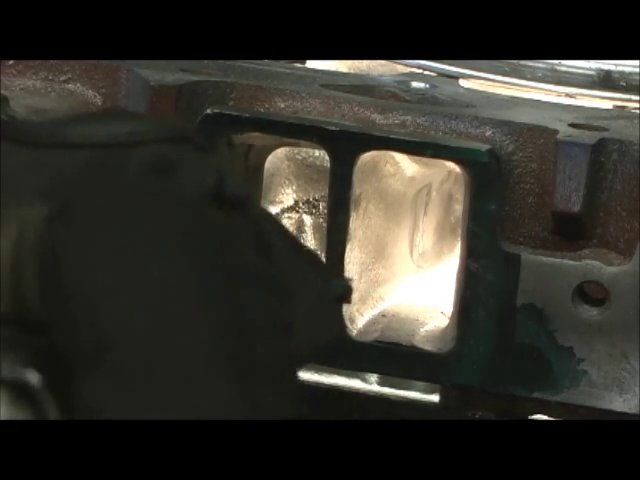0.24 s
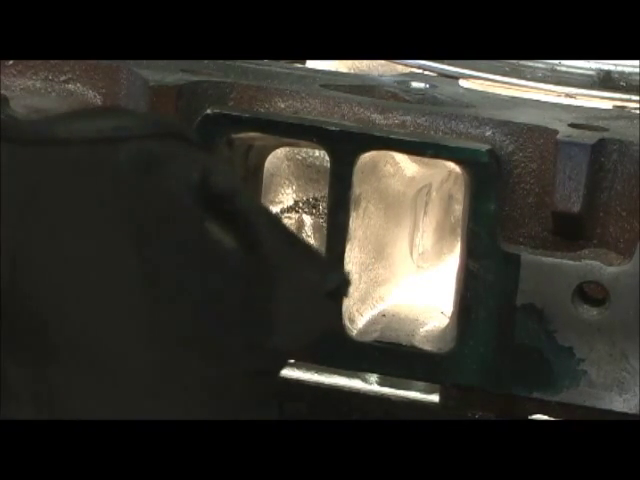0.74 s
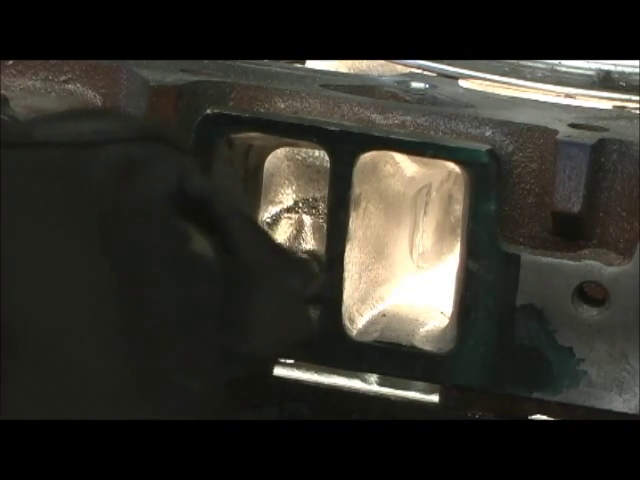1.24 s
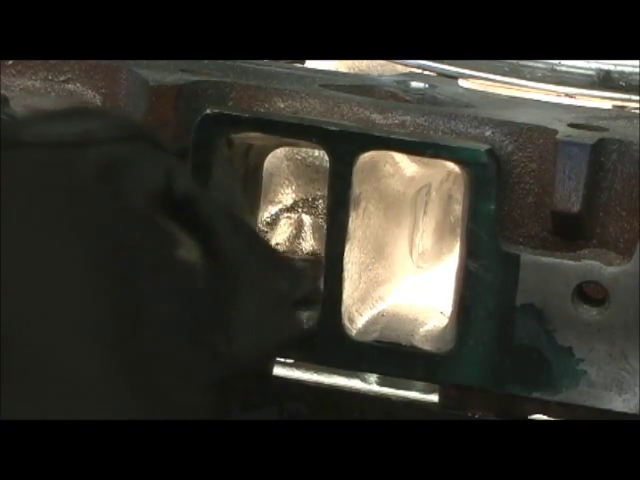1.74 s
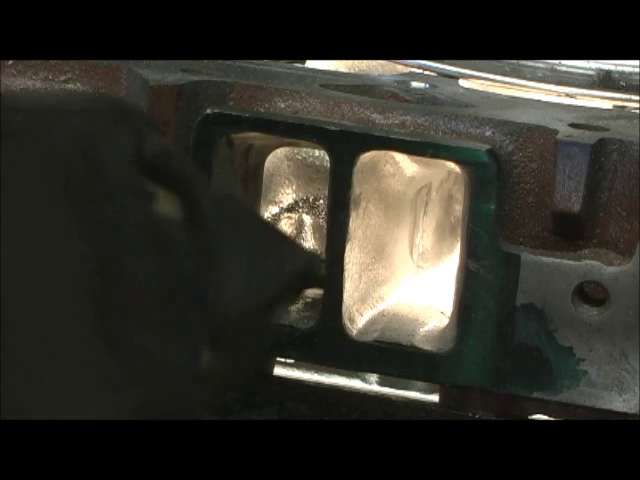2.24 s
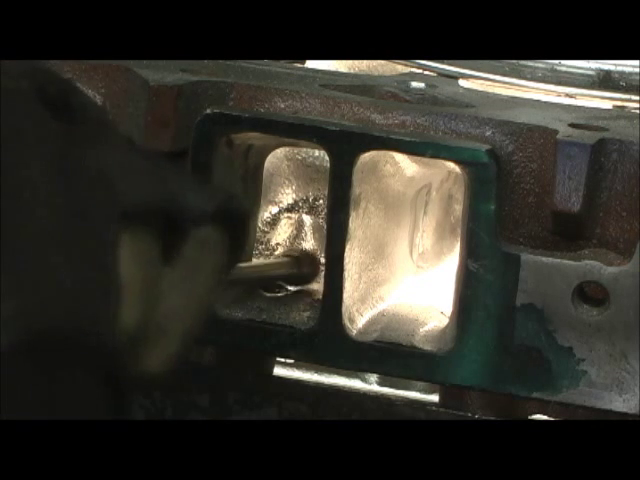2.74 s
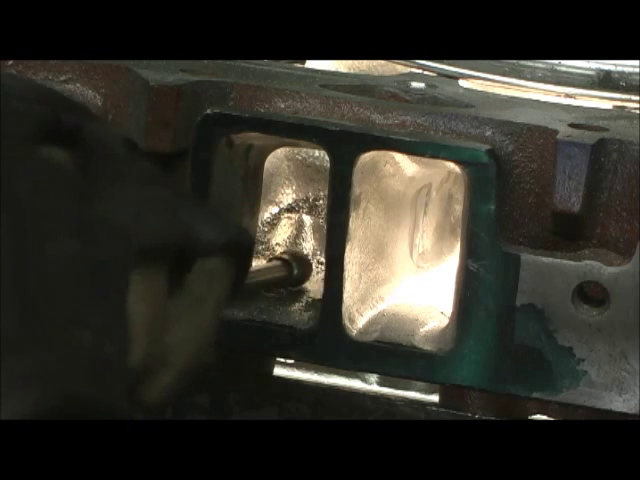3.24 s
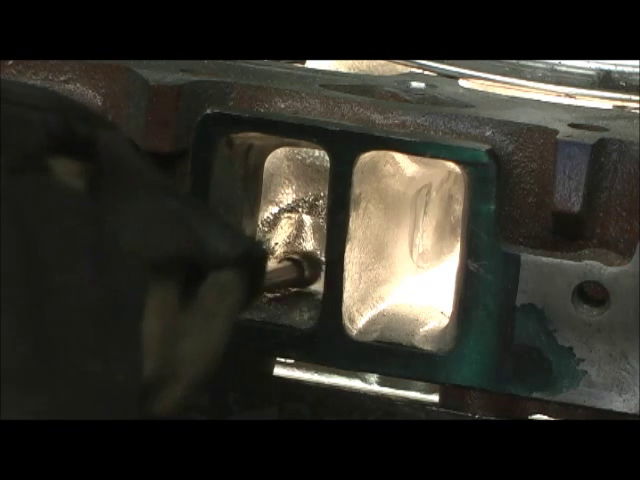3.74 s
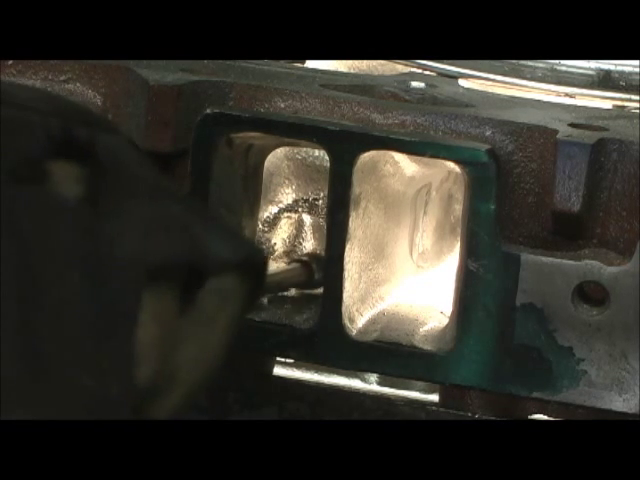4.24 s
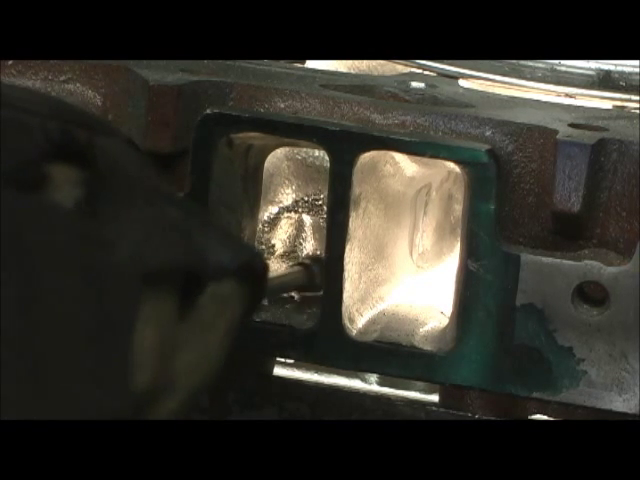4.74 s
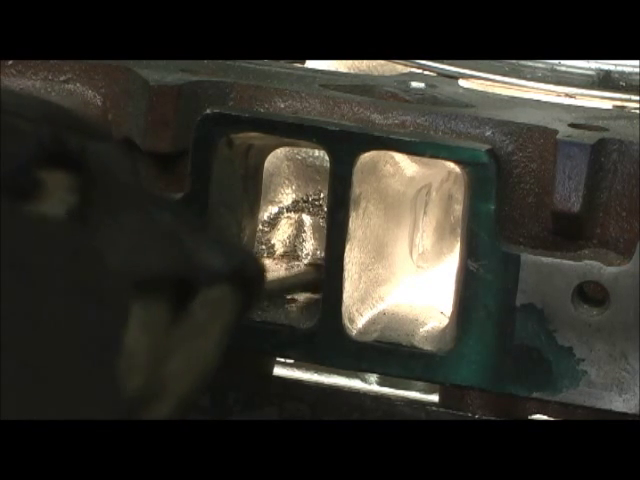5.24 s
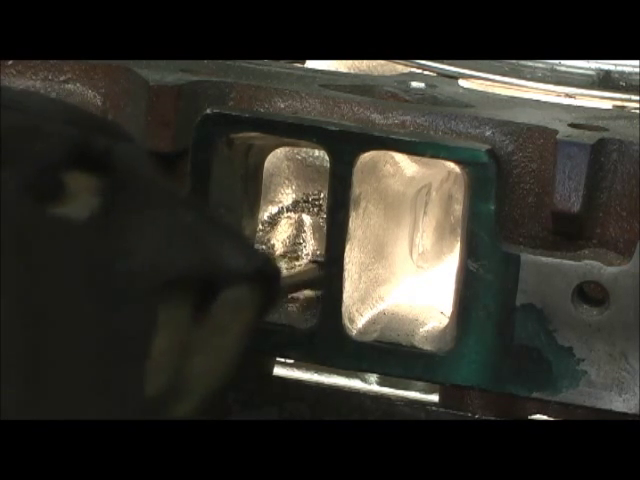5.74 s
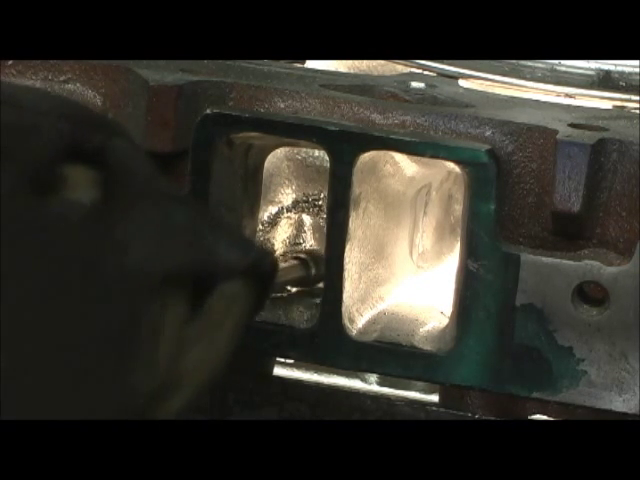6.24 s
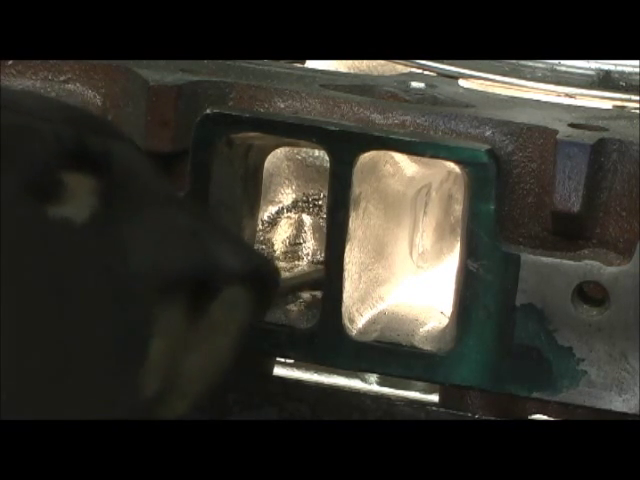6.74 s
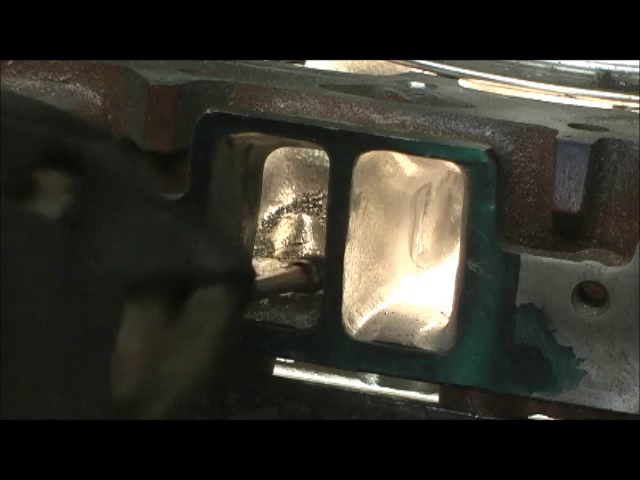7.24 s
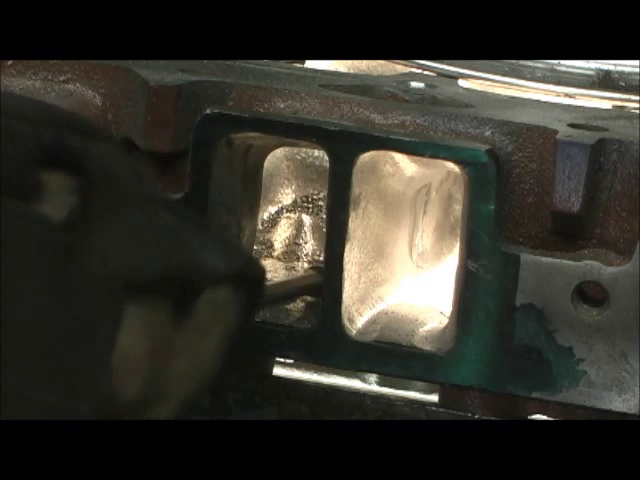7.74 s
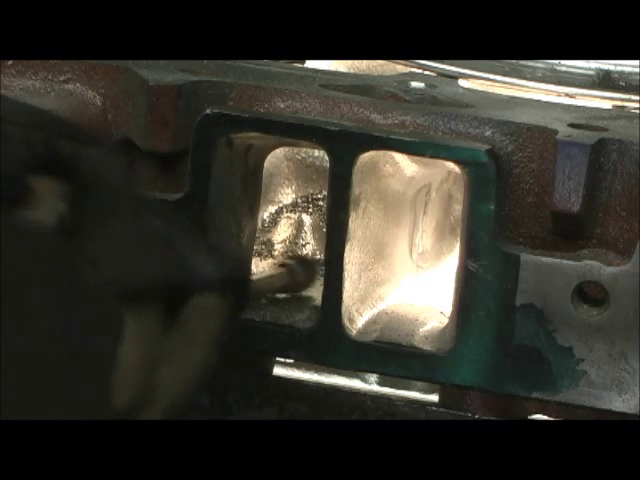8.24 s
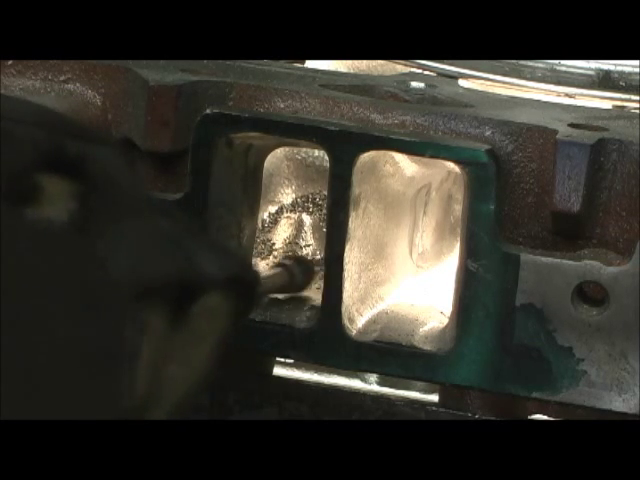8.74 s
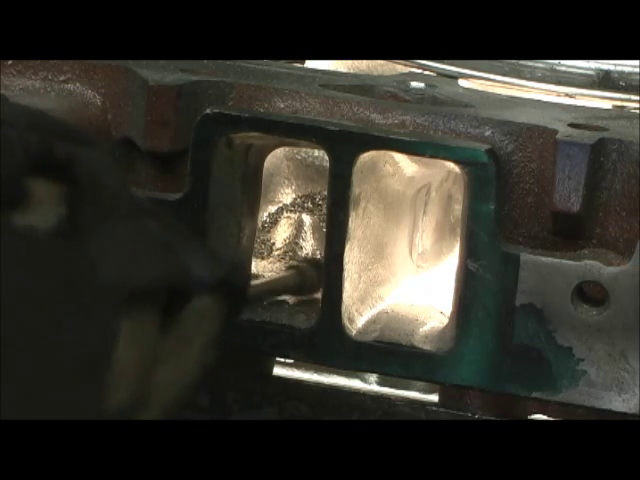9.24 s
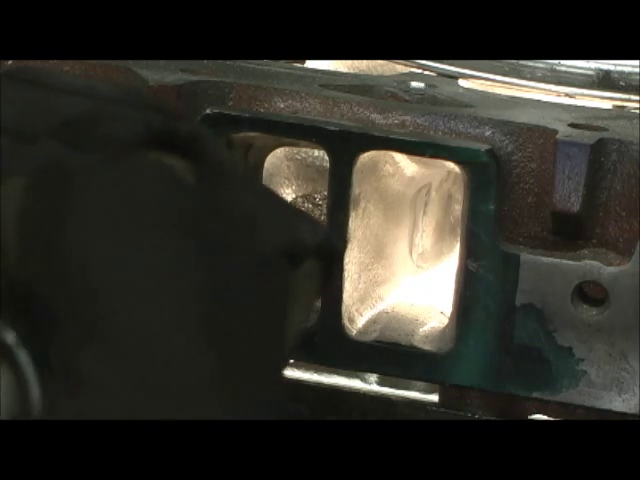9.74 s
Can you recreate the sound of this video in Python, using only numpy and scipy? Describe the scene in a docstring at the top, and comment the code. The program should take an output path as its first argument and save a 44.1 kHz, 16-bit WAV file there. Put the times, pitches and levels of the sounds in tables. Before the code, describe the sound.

A handheld die grinder grinds inside a cast-iron engine part for the full ten seconds, close to the microphone. A bright, gritty hiss and scrape dominate, over a high motor whine and a faint hum. For the first two seconds, a ringing rush of cooling air is strong and the whine is clear, wavering slightly. Around 2 seconds the pitch rises, a few thin squeals sound, and the air eases. From about 3 to 9 seconds the whine is softer and sags repeatedly as the bit is pressed in, up to three times a second, while the long shank rings and chatters. The casting rumbles very faintly on its bench. The air flares near 6.3 seconds, with a cluster of short, very high squeals until about 7 and more after 8. Around 9.5 seconds the air swells again, the ringing fades, and a longer squeal joins the continuing grinding.

```python
"""A die grinder with a long bit works inside a port (a passage) of a cast-iron engine part, close by.
Its motor whines and hums while cooling air blows. Countless grit impacts, bunched once a turn, ring the
iron and the bit's shank. The hand rocks the bit about three times a second: each press drags the whine
down and makes the shank ring louder, and each light skim along the wall hisses. Now and then the bit's
edge squeals, and the heavy casting rumbles faintly on its bench."""
import sys
import numpy as np
from scipy.fft import rfft, irfft
from scipy.io import wavfile

SR = 44100
rng = np.random.default_rng(int(sys.argv[2]) if len(sys.argv) > 2 else 0)


def int16_out(signal):
    """Quantize to a 16-bit WAV file."""
    q = np.round(np.clip(np.atleast_2d(signal).T, -1, 1) * 32767)
    wavfile.write(sys.argv[1], SR, q.astype(np.int16))


N = 441000
TIME = np.arange(N) / SR
BIN_HZ = np.maximum(np.arange(N // 2 + 1) * SR / N, 1)   # the frequencies of a spectrum


def from_db(db):
    """Turn decibels into a number to multiply a sound by."""
    return 10 ** (np.asarray(db) / 20)


def unit_level(x):
    """Scale a signal so that its average size (rms) is 1."""
    return x / np.sqrt(np.mean(x ** 2) + 1e-20)


def over_time(rows):
    """Join a table's points in time with straight lines, one curve for each column of values."""
    times, *columns = np.transpose(rows)
    return [np.interp(TIME, times, column) for column in columns]


def over_hz(points):
    """Join a table's points across frequency, giving each octave the same room."""
    hz, value = np.transpose(points)
    return np.interp(np.log(BIN_HZ), np.log(hz), value)


def drift(rate_hz):
    """A random wobble of size 1, mostly slower than the given rate."""
    return unit_level(irfft(rfft(rng.standard_normal(N)) / (1 + (BIN_HZ / rate_hz) ** 2), N))


def swell(start, length, attack, release):
    """Rise from 0 towards 1, hold, and fall back; all times are in seconds."""
    return np.clip(np.minimum((TIME - start) / attack, (start + length - TIME) / release), 0, 1)


def bumps(events, length_s):
    """A rounded bump centred on each event's time, one curve for each column of strengths."""
    events, half = np.array(events), length_s / 2
    shapes = [np.sin(np.pi / 2 * swell(s - half, length_s, half, half)) ** 2 for s in events[:, 0]]
    return events[:, 1:].T @ np.array(shapes)


def band(low_hz, high_hz, order):
    """A filter that keeps what lies between two frequencies; a higher order gives sharper edges."""
    return 1 / ((1 + (low_hz / BIN_HZ) ** order) * (1 + (BIN_HZ / high_hz) ** order))


def mode_power(modes):
    """How strongly an object answers each frequency, given its modes (the pitches it rings at)."""
    return sum(from_db(db) ** 2 / (1 + ((BIN_HZ - hz) / (width / 2)) ** 2) for hz, width, db in modes)


def play(spectrum, level_db):
    """Turn a spectrum into sound that follows a level curve."""
    return from_db(level_db) * unit_level(irfft(spectrum, N))


def tones(turns, multiples, level_db, flutter_db):
    """Tones at whole multiples of the shaft's speed, each fluttering a little in level."""
    out = 0
    for multiple, db in multiples:
        tone = np.sqrt(2) * np.sin(2 * np.pi * (round(multiple) * turns + rng.random()))
        out = out + tone * from_db(level_db + db + flutter_db * drift(9.8))
    return out


# the motor under the hand's steady lean (time [s], whine pitch [Hz], whine level [dB], hum level [dB])
STEADY_MOTOR = [(0, 1462, -35, -71), (.15, 1474, -34.5, -70), (.49, 1456, -32.5, -64),
                (1.03, 1475, -34.5, -63), (1.44, 1455, -34, -60.5), (1.93, 1484, -34, -60),
                (2.21, 1606, -34.5, -55.5), (2.45, 1510, -37.5, -57), (2.87, 1588, -39.5, -53),
                (3.38, 1594, -44, -61.5), (3.94, 1536, -40.5, -58), (5.97, 1519, -44.5, -62),
                (6.42, 1596, -41, -60), (6.75, 1469, -45, -61), (7.14, 1526, -44, -63),
                (7.62, 1480, -41.5, -59), (9.43, 1439, -38.5, -63.5), (9.53, 1565, -38, -59.5)]
# the fan's whine (multiple of shaft speed [x], level against the whine [dB])
FAN_TONES = [(5, 0), (6, -36), (7, -9), (9, -12.5), (10, -5.5), (15, -12)]
# the unbalanced shaft's hum (multiple of shaft speed [x], level against the hum [dB])
SHAFT_TONES = [(1, -3), (2, -4), (3, -2), (4, 4.5)]
# workshop resonances that lift tones sliding through them (pitch [Hz], width [Hz], strength [dB])
WORKSHOP_MODES = [(285.4, 7.5, 10), (320.5, 7.9, 9), (945, 16.6, 13), (1263, 13.1, 5.5), (1340, 17, -4),
                  (1514, 14.9, 4.5), (1594, 24, 2.5)]
FAN_BLADES, FREE_WHINE_HZ = 5, 1637   # blade count; the whine's pitch with no load on the bit
def motor(sag_hz):
    """Fan and shaft slow under load. Returns their sound, the turns made so far and the pitch lost."""
    steady_hz, whine_db, hum_db = over_time(STEADY_MOTOR)
    whine_hz = steady_hz - sag_hz
    shaft_hz = whine_hz / FAN_BLADES * (1 + 0.0021 * drift(22.5))
    turns = np.cumsum(shaft_hz) / SR
    whine = tones(turns, FAN_TONES, whine_db + 0.0383 * sag_hz, flutter_db=1.0)   # louder when pressed
    hum = tones(turns, SHAFT_TONES, hum_db, flutter_db=3.0)
    sound = irfft(rfft(whine + hum) * np.sqrt(1 + mode_power(WORKSHOP_MODES)), N)
    return sound, turns, FREE_WHINE_HZ - whine_hz


# the airy rush near 2.6-2.9 kHz: loud at the start, a ringing flare near 6.3 s, a swell near the end
# (time [s], level [dB])
RUSH_LEVELS = [(0, -28.5), (1, -29.5), (2.1, -31), (2.5, -35.5), (5.6, -36), (6.3, -32.5), (6.9, -37),
               (9.3, -38), (9.6, -30.5), (10, -39)]
# resonances that colour the rush (pitch [Hz], width [Hz], strength [dB])
RUSH_MODES = [(2637, 93, 4.5), (2830, 60, -14), (2910, 90, 9.5)]
def airy_rush():
    """Noise through a few narrow resonances makes an airy rush with a ring to it."""
    (level_db,) = over_time(RUSH_LEVELS)
    rush = rfft(rng.standard_normal(N)) * np.sqrt(mode_power(RUSH_MODES))
    return play(rush * band(1100, 2820, order=24), level_db - 1.5)


def grit(turns, bite, per_s, size_db, bunching):
    """Spectrum of many tiny impacts; the bit spins off-centre, so it bites harder once a turn."""
    sizes = from_db(size_db * np.minimum(rng.exponential(1, N), 4)) * rng.standard_normal(N)
    hits = rng.random(N) < per_s / SR
    return rfft(sizes * hits * bite * (1 + bunching * np.cos(2 * np.pi * turns)))


def wall_echoes(decay_s):
    """Spectrum of dense echoes between the port's walls, fading by 60 dB in decay_s."""
    tail = rng.standard_normal(N) * from_db(-60 * TIME / decay_s)
    return rfft(tail / np.linalg.norm(tail))


# slow changes as the bit moves about the port (time [s], scrape level [dB], hiss level [dB])
GRINDING_LEVELS = [(0, -30, -25.3), (.9, -30.5, -24.5), (1.6, -29, -24.7), (2.2, -30, -26),
                   (2.7, -27.5, -24.5), (3.4, -28.5, -23), (5.3, -28, -23.5), (6.1, -28.8, -24.5),
                   (6.85, -28.5, -25), (7.7, -27, -24), (9.35, -27, -25), (9.8, -27.5, -28), (10, -26, -24)]
# the tone colour of the scrape (frequency [Hz], relative level [dB])
SCRAPE_COLOUR = [(330, -19), (600, -17), (900, -13.5), (1300, -8.5), (1900, -1), (3300, -7), (5400, -8),
                 (6500, -3), (7600, 3.5), (9600, 2.5), (12200, -3), (14000, -10), (15600, -15)]
# resonances of port and casting (pitch [Hz], width [Hz], strength against the plain scrape [dB])
IRON_MODES = [(432, 49, 2.7), (500, 45, -1.1), (834, 49, 3.1), (976, 49, 1.1), (1547, 77, 6.2),
              (1631, 35, 1.8), (2133, 35, 3.1), (2271, 35, -2.7), (2652, 95, 4.9), (3365, 67, 2.7),
              (3470, 76, 1.8), (3794, 152, 0.3), (3930, 39, 1.2), (4304, 69, -1.7), (4846, 36, 0.3),
              (5076, 38, 2.9), (6321, 76, -1.7), (6718, 50, 1.3), (7307, 78, 0.1), (7590, 215, -0.5),
              (8222, 54, -0.7), (8568, 126, -2.1), (9258, 54, -1.0), (9846, 173, -2.8), (10666, 54, 0.6),
              (11193, 359, 0.5)]
def grinding(turns, load_hz, swing_db, rush_db):
    """Grit impacts ring the iron in six bands: digs lift the low ones, skims the high ones."""
    scrape_db, hiss_db = over_time(GRINDING_LEVELS)
    dig_db = digs()
    skim_db, skim_spray_db = skims()
    bite = from_db(0.62 * drift(28))   # the bit skips in the hand
    impacts = grit(turns, bite, per_s=36000, size_db=0.87, bunching=0.07)
    # short waves bounce between the iron walls, which puts fine ripples in the treble
    ripples = 1 + .35 * wall_echoes(decay_s=.09) * band(3600, SR, order=12)
    iron = impacts * ripples * from_db(over_hz(SCRAPE_COLOUR)) * np.sqrt(1 + mode_power(IRON_MODES))
    growl = play(iron * band(308, 1272, order=12), -39 + 0.0014 * load_hz + 0.4 * swing_db + dig_db)
    port_db = -29.35 - 0.001 * load_hz + 0.57 * swing_db + dig_db - 2 * drawn_out()
    port = play(iron * band(1170, 3350, order=12), port_db + 0.57 * drift(25))
    scrape = play(iron * band(3160, 6530, order=16), scrape_db + 0.48 * skim_db + 0.56 * dig_db)
    hiss = play(iron * band(6820, 9910, order=30), hiss_db + skim_db)
    sizzle_db = -28 - 0.015 * load_hz + 1.6 * skim_db - 0.17 * rush_db
    sizzle = play(iron * band(9650, 12260, order=30), sizzle_db)
    spray = play(iron * band(12670, 16300, order=30), -33 + .35 * rush_db + skim_spray_db)
    return growl + port + scrape + hiss + sizzle + spray


# two close pitches at which the long shank bends (pitch [Hz], width [Hz], strength [dB])
SHANK_MODES = [(3174, 24.4, 1), (3176, 57, -4.5)]
def shank_ring(turns, load_hz, swing_db, rush_db):
    """Kicked unevenly by the grit, the bit's long shank bends and sings, louder under load."""
    kicks = grit(turns, 1, per_s=6000, size_db=3.5, bunching=0.23)
    shank = 0
    for k, (hz, width, db) in enumerate(SHANK_MODES):
        resonance = 1 / (1 + 1j * (BIN_HZ ** 2 - hz ** 2) / (BIN_HZ * width))
        shank = shank + from_db(db) * resonance * 1j ** k   # the two are a quarter cycle apart
    ring_db = -34.5 + 0.0069 * load_hz + .7 * swing_db - 0.33 * rush_db - 11 * drawn_out()
    return play(kicks * shank * band(2970, 3700, order=50), ring_db + chatter())


# the bit's edge catches (start [s], length [s], pitch [Hz], level [dB])
EDGE_SQUEALS = [(0, .3, 13500, -36), (1.93, .38, 12900, -33), (2.35, .18, 12100, -32),
                (2.538, .2, 10300, -28), (5.721, 0.21, 10930, -30), (6.12, .36, 10920, -30),
                (6.388, 0.25, 10820, -24), (6.579, 0.2, 10570, -25.5), (6.824, 0.19, 10500, -24.5),
                (7.082, 0.22, 10680, -26), (8.041, .2, 11200, -31), (8.396, .18, 10960, -27),
                (8.7, .18, 11000, -31), (9.31, 0.19, 10600, -26), (9.52, .55, 9730, -24)]
def squeals(width_hz):
    """The bit's edge sticks and slips: each squeal is a narrow hiss around its own pitch."""
    rasp = drift(width_hz) + 1j * drift(width_hz)
    out = np.zeros(N)
    for start, length, hz, db in EDGE_SQUEALS:
        gain = from_db(db) * swell(start, length, attack=.07, release=.07)
        out += gain * np.real(rasp * np.exp(2j * np.pi * hz * TIME))   # moves the rasp up to the pitch
    return out


# the casting shudders (start [s], length [s], boost to the rumble [dB])
BENCH_SHUDDERS = [(2.2, .9, 5.5), (4.148, 1.4, 3.5), (4.82, 0.37, 4), (6.7, 0.73, 3), (7.449, 0.62, 6.5),
                  (8.25, 1.04, 3)]
# the tone colour of the rumble (frequency [Hz], relative level [dB])
RUMBLE_COLOUR = [(20, -30), (55, -25), (75, -11.5), (97, 1), (110, -5), (130, 1.5), (152, -7), (190, -2),
                 (228, 1), (260, -5), (400, -43)]
def bench_rumble():
    """The heavy casting and its bench rumble faintly, swelling with each shudder."""
    shudder_db = sum(db * swell(start, length, .15, .15) for start, length, db in BENCH_SHUDDERS)
    return play(rfft(rng.standard_normal(N)) * from_db(over_hz(RUMBLE_COLOUR)), -58.5 + shudder_db)


# the hand presses the bit into the iron (start [s], length [s], drop in the whine's pitch [Hz])
HAND_PRESSES = [(0.167, 0.18, 46.0), (0.588, 0.22, 28.6), (1.01, 0.21, 64.2), (1.208, 0.21, 44.7),
                (1.44, 0.2, 89.3), (1.603, 0.22, 78.8), (2.951, 0.33, 147.3), (3.46, 0.42, 180.0),
                (4.058, 0.39, 157.7), (4.631, 0.2, 118.5), (5.008, 0.2, 112.0), (5.316, 0.21, 85.0),
                (5.524, 0.23, 63.7), (5.743, 0.21, 97.7), (6.012, 0.21, 121.0), (6.18, 0.2, 142.0),
                (7.171, 0.43, 134.7), (7.7, 0.29, 100.3), (7.937, 0.22, 141.6), (8.22, 0.2, 109.8),
                (8.437, 0.2, 69.7), (8.669, 0.2, 77.0), (8.866, 0.23, 97.0), (9.08, 0.16, 87.7)]
def presses():
    """Each press slows the motor; gives how far the whine sags, in Hz."""
    return sum(hz * swell(start, length, attack=.06, release=.09) for start, length, hz in HAND_PRESSES)


# the bit digs in (time [s], level change [dB])
BIT_DIGS = [(.3, -0.5), (1.06, 1.5), (1.45, 0), (1.82, 1.5), (2.68, 0), (3.05, 0.1), (3.53, 1.5),
            (4.14, 1.5), (4.73, 1), (5.98, 1), (6.24, 0.5), (7.27, 0), (7.68, 0.7), (9.12, 0.7)]
def digs():
    """Digging in makes a hollow rasp; gives the change in the low grinding bands, in dB."""
    return bumps(BIT_DIGS, length_s=0.27)[0]


# the bit skims the wall (time [s], change in the hiss [dB], change in the finest spray [dB])
WALL_SKIMS = [(.37, 0.7, .5), (2.05, .6, 1), (2.88, 0.5, 1), (3.41, 0, 3), (3.75, 1.2, 1), (4.05, 0, 0),
              (4.46, 0.7, 0), (4.82, 0.5, 0), (5.15, 0.5, 1), (5.35, 0.8, 1), (5.52, 0.8, 1.8),
              (6.16, 1.5, -1), (7.02, 0, 0), (7.3, .6, 1.5), (7.62, 0.5, 1.3), (7.88, 0.3, 2),
              (8.13, 0.3, 1), (8.48, 0, 1.8), (8.8, 1, 2), (9.18, 0.5, 1), (9.38, 1.5, 1), (9.66, 0.5, 2),
              (9.92, -1.5, 4)]
def skims():
    """A light touch along the wall hisses; gives the changes in hiss and spray, in dB."""
    return bumps(WALL_SKIMS, length_s=0.31)


# the shank chatters (time [s], boost to its ring [dB])
SHANK_CHATTERS = [(.73, 4), (1.05, 4), (1.53, 6), (1.68, 3), (2.03, 2.5), (2.47, 3), (2.6, 5), (3.06, 3.5),
                  (3.38, 1), (3.92, 4), (4.23, 3), (5.12, 0), (5.42, 3), (5.85, 2.2), (6.08, 2), (6.27, 5),
                  (6.46, 4), (6.73, 1.5), (6.95, 3), (7.75, 3), (8.03, 3.5), (8.6, 0), (8.91, 3.5),
                  (9.15, 0.5)]
def chatter():
    """Chattering makes the shank's ring flare briefly; gives the boost in dB."""
    return bumps(SHANK_CHATTERS, length_s=0.16)[0]


def drawn_out(start_s=9.38, takes_s=.3):
    """The bit is drawn out: 0 while it is inside the port, 1 at the mouth."""
    return np.clip((TIME - start_s) / takes_s, 0, 1)


# the microphone's two sides differ in treble level (frequency [Hz], left minus right [dB])
SIDE_BALANCE = [(5400, 0), (6000, -1.1), (9000, -.9), (10400, -2), (11400, 2), (12700, 4.3), (13450, 7.3),
                (14400, 3.8), (16000, 2.3)]
# they also differ in timing (frequency [Hz], left's lead over right [radians])
SIDE_PHASE = [(6000, 0), (9800, -.55), (12500, -1.6), (14200, -1.05), (15500, -1.1)]
# scattered sound, which reaches the two sides differently (frequency [Hz], share [dB])
SCATTER_SHARE = [(25, -10), (70, -25), (200, -27), (450, -33), (950, -38), (1400, -55), (2300, -52),
                 (3100, -40), (5200, -34), (6000, -10), (7300, -12), (9600, -9.5), (10900, -5.5),
                 (16000, -4.5)]
def microphone(direct, scattered):
    """Two close openings hear the bass alike, the treble with different level, delay and scatter."""
    side = np.array([[1], [-1]])   # left, right
    direct_gain = from_db(side * over_hz(SIDE_BALANCE) / 2) * np.exp(.5j * side * over_hz(SIDE_PHASE))
    scatter_gain = direct_gain * side * from_db(over_hz(SCATTER_SHARE))
    both = direct_gain * rfft(direct) + scatter_gain * rfft(scattered)
    joint_gain = np.hypot(abs(direct_gain.mean(axis=0)), abs(scatter_gain.mean(axis=0)))
    return irfft(both / joint_gain, N)   # keeps the level of the two sides together


def scene():
    """One turning shaft, slowed by the load on the bit, drives whine, hum, grit and ring."""
    motor_sound, turns, load_hz = motor(presses())
    swing_db = over_time(GRINDING_LEVELS)[0] + 29.5   # how far the scrape is above its usual level
    rush_db = over_time(RUSH_LEVELS)[0] + 35.5   # how far the airy rush is above its usual level
    # the cutting is made twice with fresh noise: once arriving straight, once scattered
    straight, scattered = [
        grinding(turns, load_hz, swing_db, rush_db) + shank_ring(turns, load_hz, swing_db, rush_db)
        + squeals(width_hz=1150) + bench_rumble() for _ in range(2)]
    return microphone(motor_sound + airy_rush() + straight, scattered)


def record(dry):
    """The very highest treble is cut off steeply."""
    cutoff_hz = 15850
    return irfft(rfft(dry) / (1 + (BIN_HZ / cutoff_hz) ** 250), N)


dry = scene()
out = record(dry)
int16_out(out)
```